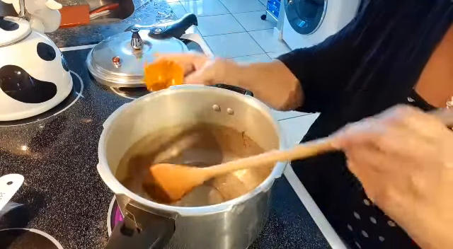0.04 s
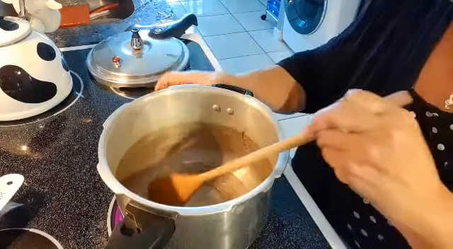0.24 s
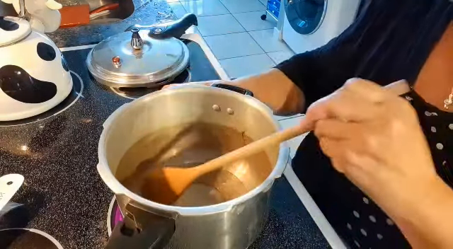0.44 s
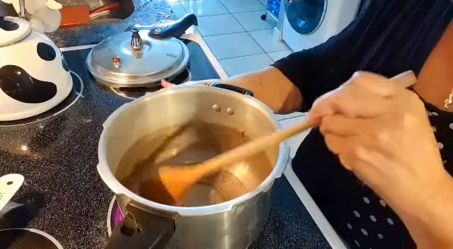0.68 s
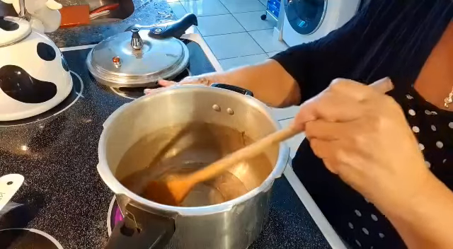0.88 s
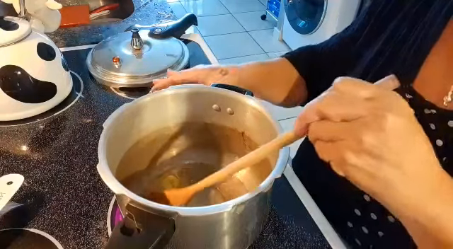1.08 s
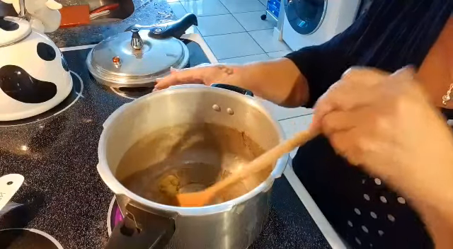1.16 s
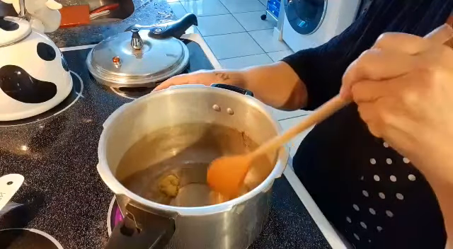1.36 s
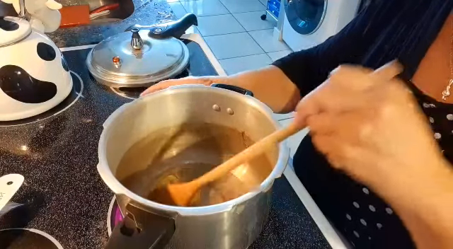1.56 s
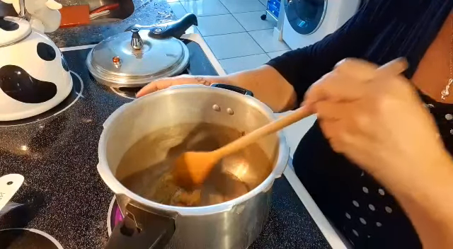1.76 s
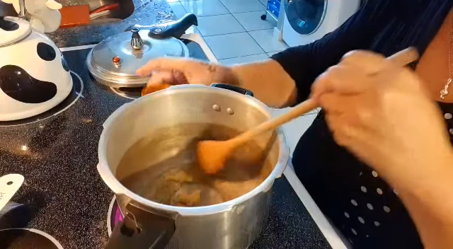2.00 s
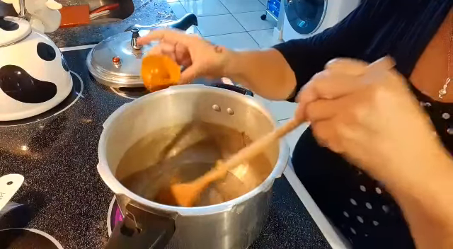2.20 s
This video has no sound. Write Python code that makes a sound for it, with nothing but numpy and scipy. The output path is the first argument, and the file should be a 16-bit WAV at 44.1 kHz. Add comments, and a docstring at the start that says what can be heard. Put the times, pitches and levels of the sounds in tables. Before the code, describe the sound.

Close stereo sound of a wooden spoon scraping and knocking in a metal pot, wet hissing strokes in uneven rhythm, one sharp double-contact clack near the start, live tiled room, low appliance hum behind.

```python
"""A wooden spoon stirs wet food in a big metal pot: hissing, gritty strokes made of shaped noise,
and dull knocks made of decaying pot modes with a noisy crunch and tick.
Once something hard, probably a small cup set down behind the pot, clacks and rings through the tiled
kitchen: short modes and noise puffs, twice in quick succession.
An appliance motor hums in the background: wavering sine partials over a bed of room-air noise."""
import sys
import numpy as np
from scipy import signal
from scipy.fft import rfft, irfft, next_fast_len
from scipy.io import wavfile
from scipy.ndimage import map_coordinates

SR = 44100
rng = np.random.default_rng(int(sys.argv[2]) if len(sys.argv) > 2 else 0)


def generate_wav(sig):
    """Save sig (samples, or channels by samples) to the path in sys.argv[1] as 16-bit PCM at SR."""
    pcm = np.round(np.clip(np.atleast_2d(sig).T, -1, 1) * 32767).astype(np.int16)
    wavfile.write(sys.argv[1], SR, pcm)


N = 98607  # samples

# Motor partials: multiple of the motor frequency, level/dB
MOTOR_PARTIALS = [(2, -57.5), (5, -68.5), (7, -66), (9, -73.5), (11, -70.5), (35, -86.5), (38, -84),
                  (39, -74.5)]
MOTOR_HZ = 58.03
DRONE_HZ, DRONE_DB = 75.5, -52
WAVER_DB = 2  # scales the random level curve of every partial
# Kitchen air colour: f/Hz, relative level/dB
AIR_COLOUR = [(35, -13), (55, 4), (115, 9), (160, -4.5), (420, -11), (620, -20), (800, -31.5),
              (1100, -37.5), (1900, -33), (2280, -24), (2700, -39), (6000, -47.5), (15000, -43)]
AIR_DB = -51.5

# Strokes of the spoon, one list each: t/s, wet hiss level/dB, scraping on metal level/dB
STROKES = [
    [(.322, -78, -74), (.345, -57.5, -65), (.37, -56, -52.5), (.41, -65.5, -68), (.48, -82.5, -81.5)],
    [(.88, -72.5, -68), (.915, -55.5, -45), (.945, -52.5, -50), (.98, -51, -54), (1.0, -59, -65),
     (1.06, -79, -98)],
    [(1.22, -83.5, -82), (1.294, -67.5, -94), (1.305, -56.5, -72), (1.348, -50.5, -58), (1.368, -59.5, -67),
     (1.396, -51, -50.5), (1.42, -63, -62), (1.466, -63.5, -68), (1.5, -69, -82)],
    [(1.70, -56, -73), (1.71, -55, -62.5), (1.74, -58.5, -55), (1.808, -43, -41), (1.843, -47, -46),
     (1.884, -61.5, -60.5), (1.897, -47, -43), (1.92, -76, -91), (1.98, -94, -89)],
    [(1.985, -70, -75), (2.035, -60.5, -57.5), (2.075, -60, -51), (2.10, -52.5, -56), (2.19, -59.5, -64),
     (2.237, -66, -65.5)],
]
# Colour of the wet hiss: f/Hz, relative level/dB
HISS_COLOUR = [(300, -27), (1500, -7), (4000, 2.5), (8500, 2.5), (10500, 0), (13000, 1.5), (15500, -12)]
# Colour of the scraping: f/Hz, relative level/dB
SCRAPE_COLOUR = [(150, 3), (450, 0.5), (800, -0.5), (1150, 0), (2200, 0.5), (3000, -8.5), (4400, -5),
                 (8000, -32)]
GRAINS_PER_S, GRAIN_SHARE = 1200, 0.29  # share of the power that is sparks, the rest is steady noise
SLIPS_PER_S, SLIP_DB = 130, 1.7  # rate and depth of the flutter in level
SCRAPE_RING_DB = -1.5  # pot modes against the scraping noise

# Spoon on pot: t/s, two favoured modes f/Hz and f/Hz, their boost level/dB,
# then relative levels of thud/dB, wood/dB, low ring/dB, high ring/dB and tick/dB
KNOCKS = [(0.342, 151, 1738, 2.5, -31, -38.5, -51, -46, -73),
          (0.801, 842, 2270, 11, -57, -59, -42.5, -49.5, -76),
          (0.9128, 1145, 1215, 11, -23, -25.5, -29, -36, -54),
          (.962, 172, 172, 7.5, -35, -37.5, -54, -58, -58),
          (1.4035, 172, 1115, 12.5, -39, -42, -34, -51, -54),
          (1.7013, 151, 490, 5.5, -31.5, -33, -71, -54, -67),
          (1.8863, 1115, 2270, 8.5, -40, -51, -47.5, -47, -43),
          (2.0435, 1030, 2022, 15, -38.5, -33, -31, -42.5, -42.5),
          (2.064, 172, 2022, 16.5, -39, -31.5, -42, -42, -64),
          (2.092, 172, 525, 4.5, -28, -37, -45, -63, -45)]
# Where the thud, wood, low ring and high ring levels apply: f/Hz
KNOCK_BANDS_HZ = [175, 480, 950, 2000]
# Modes of the loaded pot and spoon: f/Hz, relative level/dB, t60/s
POT_MODES = [(149.3, 0.5, 0.13), (170.3, -6, 0.23), (265, -18, 0.51), (402.5, -2, 0.057),
             (493.4, -5.5, 0.11), (534, -19, 0.25), (849.6, -14, 0.16), (1031, -13, 0.082),
             (1121, -8.5, 0.12), (1121.7, -16.5, 0.11), (1209, -13, 0.05), (1728, -5, 0.083),
             (2022, -15.5, 0.27), (2264, -9.5, 0.077)]
# Colour of the contact tick: f/Hz, relative level/dB
TICK_COLOUR = [(200, 12), (1500, -11), (4000, 9), (9000, -6), (15000, -18)]
TICK_T60, CRUNCH_T60 = 0.06, 0.13  # s
CRUNCH_DB = -7.5  # against the wood level
WOOD_TOP_HZ = 660  # the crunch is down to the low ring level here
ATTACK_CYCLES = 0.61  # swell of a struck mode, in its own cycles

# Contacts of the cup: t/s, ring level/dB, clatter level/dB, crack level/dB
CUP_CONTACTS = [(0.617, -10, -21.5, -28.5), (0.62724, -16, -25, -36)]
# Modes of the cup and worktop: f/Hz, relative level/dB, t60/s
CUP_MODES = [(281.4, -31, .3), (342, -13, 0.067), (481.5, -28.5, 0.27), (693.8, -27, 0.16),
             (865, -24.5, 0.14), (1393, -25, 0.23), (1775, -23, 0.18), (2005, -23.5, 0.29),
             (2050, -14.5, 0.063), (2165, -30.5, 0.39), (2286, -1, 0.016), (2630, -30, 0.12),
             (2920, -30, .16), (3350, -10.5, .01), (4700, -17, 0.012)]
# Colour of the clatter: f/Hz, relative level/dB
CLATTER_COLOUR = [(120, 0), (330, -12), (600, -8.5), (1100, -13), (1750, -2.5), (2300, 1.5), (3000, -3),
                  (4700, -11), (5600, -25.5), (9000, -33.5)]
# Colour of the crack: f/Hz, relative level/dB
CRACK_COLOUR = [(1000, -2), (4000, -2), (7500, -7.5), (9000, -15.5), (11000, -5), (13500, -20),
                (15500, -32)]
CLATTER_T60, CRACK_T60 = 0.032, 0.04  # s
CUP_LEFT_DB = -1  # left over right

# Decay of the tiled room: f/Hz, t60/s
ROOM_T60 = [(150, 0.28), (400, 0.48), (7000, 0.45), (14000, 0.55)]
# Colour of the room's answer: f/Hz, relative level/dB
ROOM_COLOUR = [(120, -6.5), (300, -0.5), (700, 2), (2000, -6), (5000, -4), (12000, -6.5)]
ROOM_BUILD_S = 0.0019
STIR_ROOM_DB, KNOCK_RING_ROOM_DB, KNOCK_CONTACT_ROOM_DB = -4, -6.5, -12
CUP_RING_ROOM_DB, CUP_CLATTER_ROOM_DB = -3.5, 7.5

# Stereo balance: f/Hz, left over right level/dB
LEFT_DB = [(80, 6), (180, 7), (350, 2), (600, 4), (1100, 4), (2500, 3), (12000, 3)]
# Likeness of left and right in noisy sounds: f/Hz, correlation
ALIKE = [(150, 0.89), (450, 0.8), (1000, 0.098), (2200, 0.057), (7000, .05)]
# Stereo phase of a mode: f/Hz, lead on the left and equal lag on the right/rad
LEFT_LEAD = [(150, -0.048), (500, -0.024), (1100, 0.68), (2100, -0.55), (4000, .5)]
LOW_CUT_HZ, TOP_HZ = 54, 15800


def amp(db):
    """Gain of a level in dB."""
    return 10 ** (np.asarray(db) / 20)


def unit(x):
    """x at rms 1."""
    return x / np.sqrt(np.mean(x ** 2) + 1e-20)


def along(points, hz):
    """Read a curve of (Hz, value) points on a log frequency axis."""
    f, value = np.transpose(points)
    return np.interp(np.log(hz + 1), np.log(f + 1), value)


def wobble(rate):
    """A smooth random curve with rate knots a second."""
    knots = rng.standard_normal(2048)
    return map_coordinates(knots, [np.arange(N) * rate / SR], mode="wrap")


def filtered(x, response):
    """Shape x by a response of frequency, padded so that its tail does not wrap round."""
    size = next_fast_len(x.shape[-1] + SR // 4)
    spectrum = rfft(x, size) * response(np.fft.rfftfreq(size, 1 / SR))
    return irfft(spectrum, size)[..., :x.shape[-1]]


def coloured(pair, colour):
    """Blend two unrelated signals into stereo of rms 1, alike in the bass and wide above."""
    def mid_side_gains(hz):
        angle = np.arccos(np.clip(along(ALIKE, hz), -1, 1)) / 2
        return amp(along(colour, hz)) * np.array([np.cos(angle), np.sin(angle)])

    mid, side = filtered(pair, mid_side_gains)
    return unit(np.array([mid + side, mid - side]))


def burst(colour, t60):
    """A puff of coloured noise that dies exponentially."""
    t = np.arange(SR // 2) / SR
    noise = coloured(rng.standard_normal((2, len(t))), colour)
    return noise * amp(-60 * t / t60)


def ring(modes, colour):
    """Struck modes weighted by the colour of the blow; low ones swell more slowly."""
    t = np.arange(SR // 2) / SR
    out = 0
    for hz, db, t60 in modes:
        phase = along(LEFT_LEAD, hz) * np.array([[1], [-1]])
        swell = 1 - np.exp(-(t * hz / ATTACK_CYCLES) ** 2)
        decay = amp(db + along(colour, hz) - 60 * t / t60)
        out = out + swell * decay * np.cos(2 * np.pi * hz * t + phase)
    return out


def add(track, s, sound):
    """Mix a sound into the track at s seconds, cut off at the end of the track."""
    part = track[:, round(s * SR):][:, :sound.shape[1]]
    part += sound[:, :part.shape[1]]


def kitchen(x, room_db):
    """x plus the tiled room's answer: a noise tail in which each frequency dies at its own speed."""
    hz, t, bins = signal.stft(rng.standard_normal((2, SR * 3 // 5)), SR, nperseg=256)
    decay = amp(-60 * t / along(ROOM_T60, hz)[:, None])
    tail = signal.istft(bins * decay, SR, nperseg=256)[1]
    tail_t = np.arange(tail.shape[1]) / SR
    tail = tail * (1 - np.exp(-(tail_t / ROOM_BUILD_S) ** 2))
    tail = tail / np.linalg.norm(tail[0])
    tail = filtered(tail, lambda f: amp(along(ROOM_COLOUR, f)))
    answer = signal.fftconvolve(x, tail, axes=1)[:, :x.shape[1]]
    return x + amp(room_db) * answer


def appliance():
    """Motor harmonics and a low drone, wavering in level and phase, over the air of the room."""
    t = np.arange(N) / SR
    out = amp(AIR_DB) * coloured(rng.standard_normal((2, N)), AIR_COLOUR)
    partials = [(multiple * MOTOR_HZ, db) for multiple, db in MOTOR_PARTIALS]
    for hz, db in partials + [(DRONE_HZ, DRONE_DB)]:
        stereo_phase = np.array([[-.35], [.35]])
        phase = 2 * np.pi * hz * t + 0.58 * wobble(7.67) + stereo_phase
        level = amp(db + WAVER_DB * wobble(8.22))
        out = out + np.sqrt(2) * level * np.sin(phase)  # root 2 makes db an rms level
    return out


def grains():
    """Dense tiny slips as random sparks on a bed of noise."""
    sparks = (rng.random(N) < GRAINS_PER_S / SR) * rng.standard_normal((2, N))
    bed = rng.standard_normal((2, N))
    return np.sqrt(GRAIN_SHARE) * unit(sparks) + np.sqrt(1 - GRAIN_SHARE) * bed


def pot_response(f):
    """The pot as a bank of resonators, each as narrow as its decay is long."""
    out = 0
    for hz, db, t60 in POT_MODES:
        damping = 1j * f * np.log(1000) / np.pi / t60
        out = out + amp(db) * damping / (hz * hz - f * f + damping)
    return out


def stirring():
    """The food hisses as it is pushed; the spoon's edge scrapes the metal and stirs up its modes."""
    t = np.arange(N) / SR
    hiss_gain, scrape_gain = 0, 0
    for stroke in STROKES:
        s, hiss_db, scrape_db = np.transpose(stroke)
        # silent outside the stroke
        hiss_gain = hiss_gain + amp(np.interp(t, s, hiss_db, -np.inf, -np.inf))
        scrape_gain = scrape_gain + amp(np.interp(t, s, scrape_db, -np.inf, -np.inf))
    hiss = coloured(grains(), HISS_COLOUR)
    pot_ring = unit(filtered(grains(), pot_response))
    scrape = coloured(grains(), SCRAPE_COLOUR) + amp(SCRAPE_RING_DB) * pot_ring
    rub = hiss_gain * hiss + scrape_gain * scrape
    flutter = amp(SLIP_DB * wobble(SLIPS_PER_S))
    return kitchen(rub * flutter, STIR_ROOM_DB)


def spoon_knocks():
    """Each blow rings the loaded pot, one or two modes most of all, with a short crunch and a tick."""
    out = np.zeros((2, N))
    for s, first_hz, second_hz, favour_db, thud_db, wood_db, low_db, high_db, tick_db in KNOCKS:
        colour = list(zip(KNOCK_BANDS_HZ, [thud_db, wood_db, low_db, high_db]))
        # the modes nearest to the two favoured frequencies
        favoured = [np.argmin([abs(hz - spot_hz) for hz, _, _ in POT_MODES])
                    for spot_hz in (first_hz, second_hz)]
        modes = [(hz, db + favour_db * (k in favoured), t60)
                 for k, (hz, db, t60) in enumerate(POT_MODES)]
        # the crunch follows the blow's colour, with the edges rolled off
        edges = [(80, thud_db - 27.5), (WOOD_TOP_HZ, low_db), (3200, high_db - 25), (8000, high_db - 41)]
        crunch = amp(wood_db + CRUNCH_DB) * burst(sorted(colour + edges), CRUNCH_T60)
        tick = amp(tick_db) * burst(TICK_COLOUR, TICK_T60)
        add(out, s, kitchen(ring(modes, colour), KNOCK_RING_ROOM_DB))
        add(out, s, kitchen(crunch + tick, KNOCK_CONTACT_ROOM_DB))
    return out


def cup():
    """A hard little object lands and bounces a hundredth of a second later, ringing the same modes."""
    tone, clatter = np.zeros((2, 2, N))
    for s, ring_db, clatter_db, crack_db in CUP_CONTACTS:
        add(tone, s, ring(CUP_MODES, [(1, ring_db)]))
        add(tone, s, amp(crack_db) * burst(CRACK_COLOUR, CRACK_T60))
        add(clatter, s, amp(clatter_db) * burst(CLATTER_COLOUR, CLATTER_T60))
    in_room = kitchen(tone, CUP_RING_ROOM_DB) + kitchen(clatter, CUP_CLATTER_ROOM_DB)
    return in_room * amp(CUP_LEFT_DB * np.array([[.5], [-.5]]))


def scene():
    """Stirring, knocks and the cup over the appliance hum."""
    return appliance() + stirring() + spoon_knocks() + cup()


def record(dry):
    """The microphone sheds deep bass and hears more on the left; nothing is kept above the band limit."""
    low_cut = signal.butter(2, LOW_CUT_HZ, "high", fs=SR, output="sos")
    thin = signal.sosfilt(low_cut, dry)
    sides = np.array([[.5], [-.5]])
    return filtered(thin, lambda hz: amp(along(LEFT_DB, hz) * sides) * (hz < TOP_HZ))


dry = scene()
out = record(dry)
generate_wav(out)
```